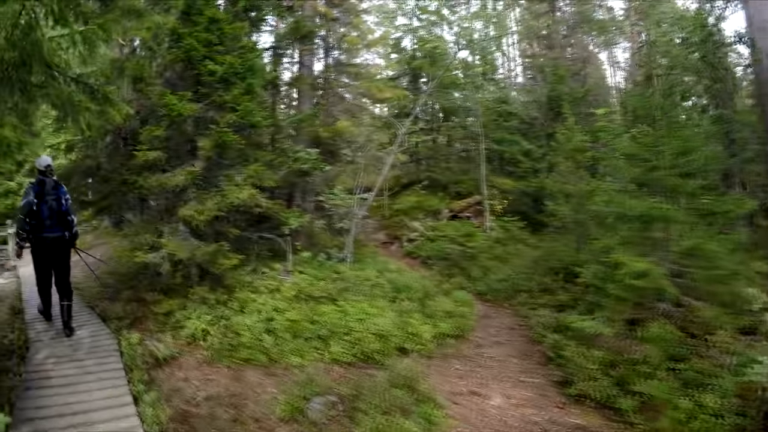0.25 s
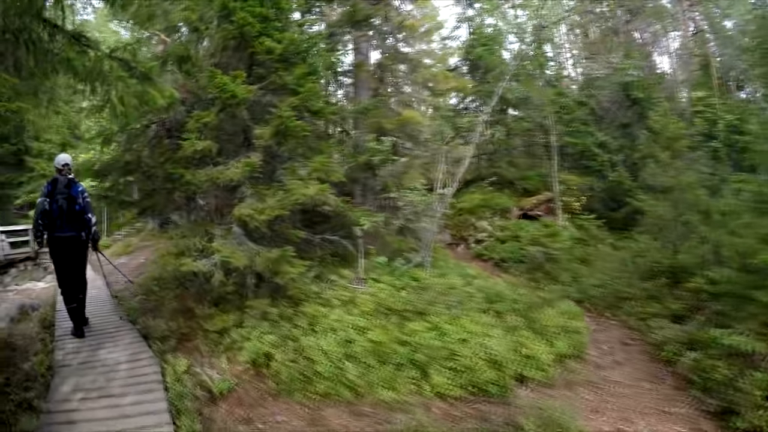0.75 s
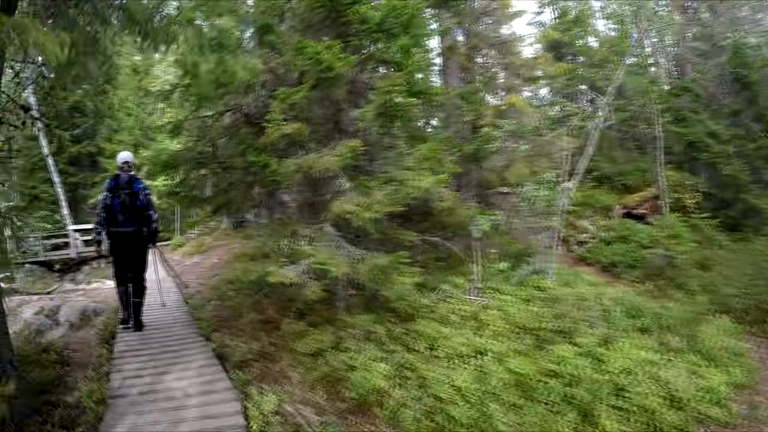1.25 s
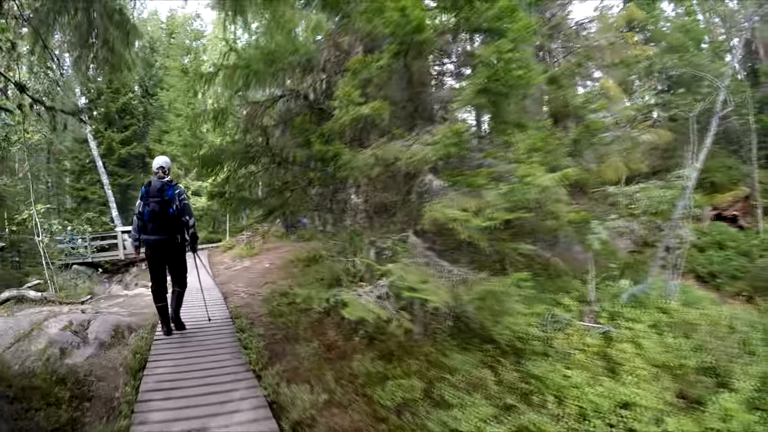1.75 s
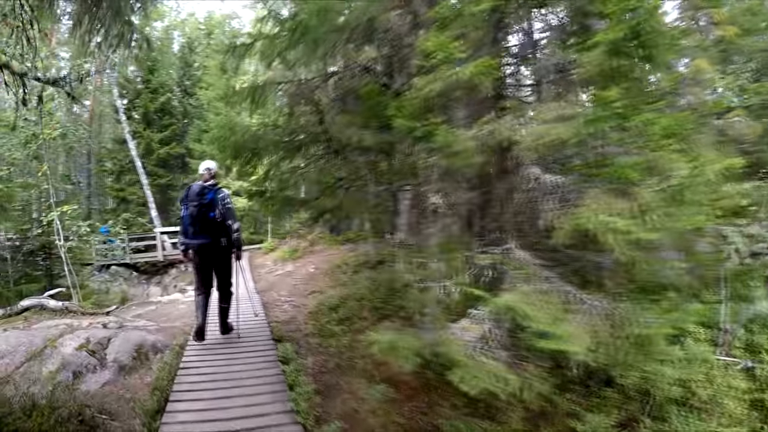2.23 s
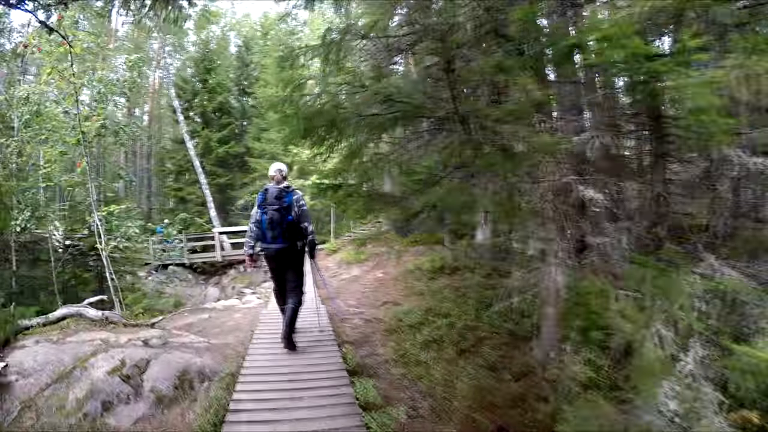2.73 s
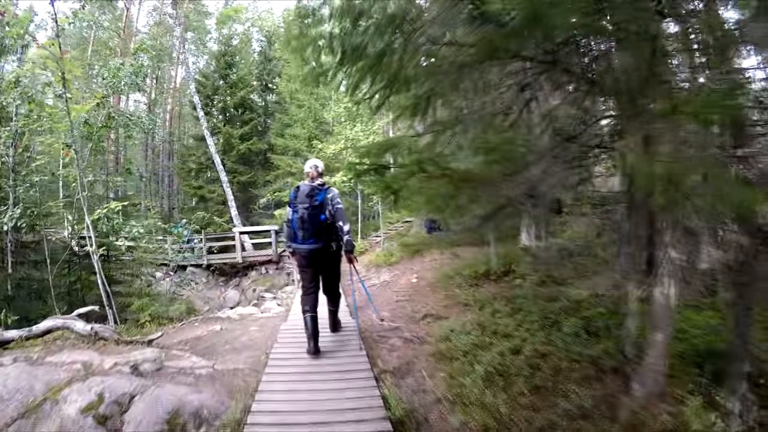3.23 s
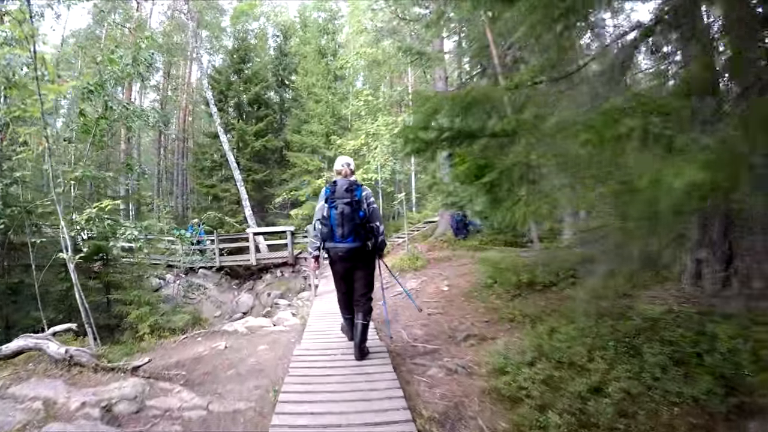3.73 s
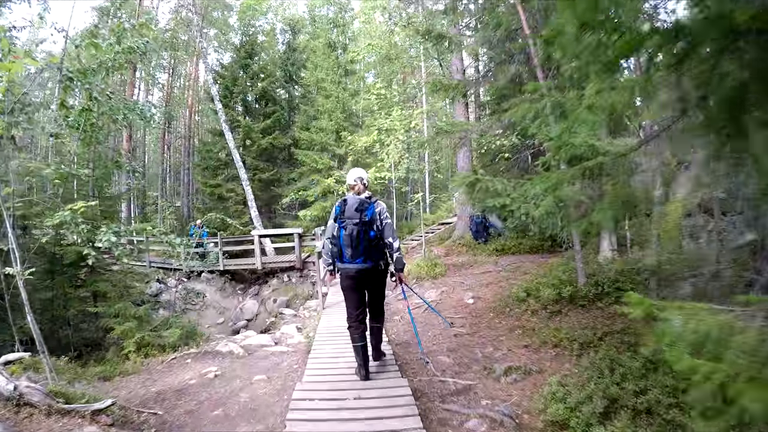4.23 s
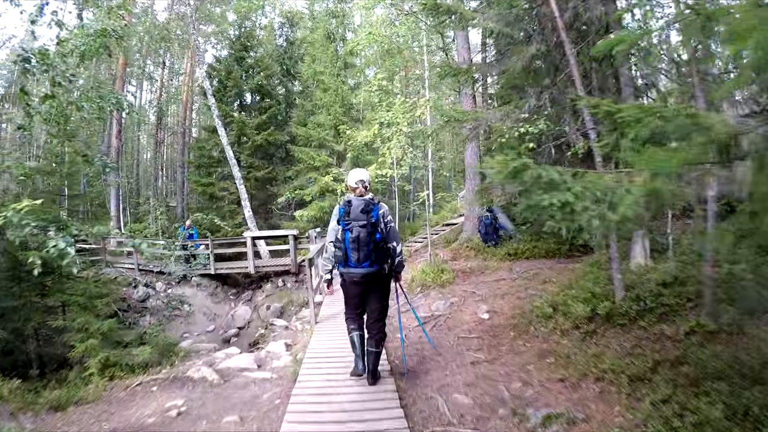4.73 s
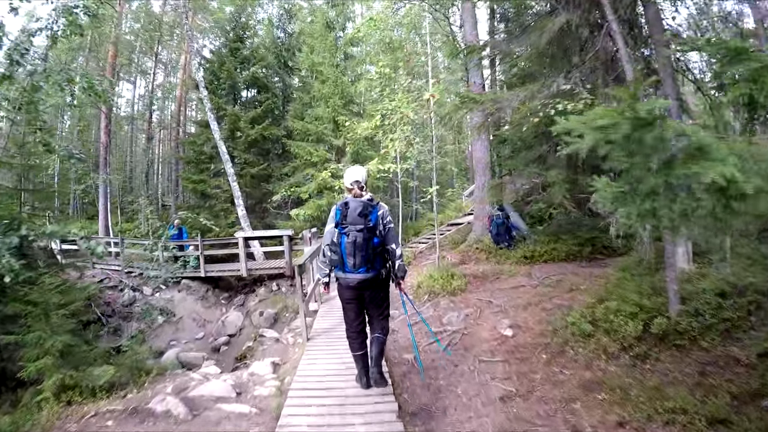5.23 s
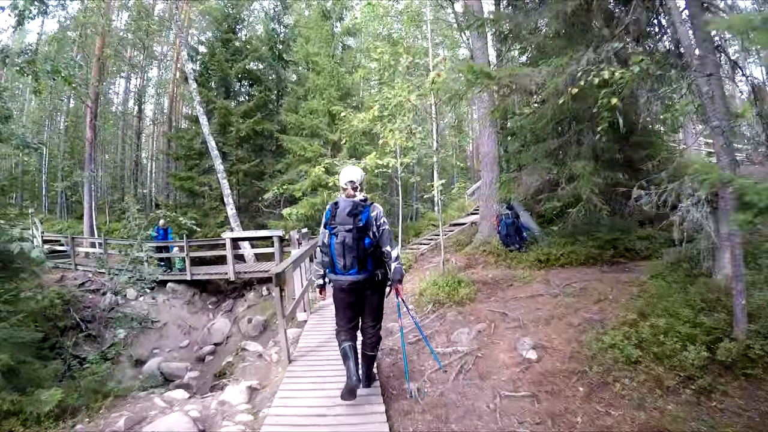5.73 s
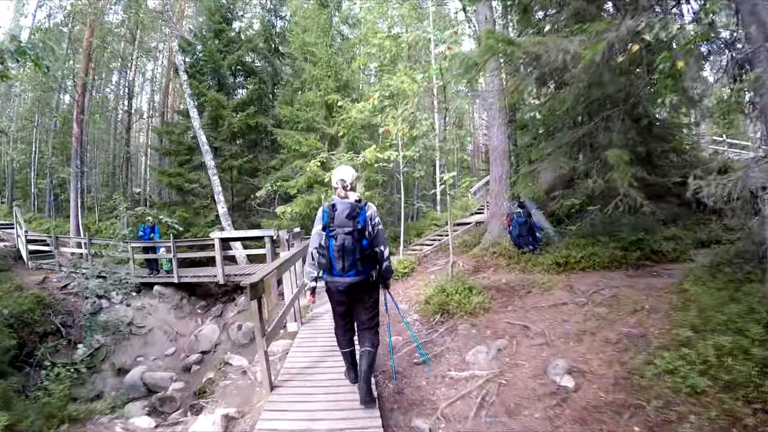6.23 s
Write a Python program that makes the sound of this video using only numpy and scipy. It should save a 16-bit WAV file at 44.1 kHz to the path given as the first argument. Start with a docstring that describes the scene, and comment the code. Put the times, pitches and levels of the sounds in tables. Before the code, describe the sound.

Hiking boots walk at an even pace along a wooden boardwalk in a quiet forest. Each step is a dull, hollow heel knock and a sole slap that leave the planks shuddering, light at first and heavier later. Clothes rub faintly, walking poles and grit tick, and something brushes softly past the hand-held microphone after the middle. Low rumble and a soft hiss lie underneath.

```python
"""Hiking boots walk down a wooden boardwalk in a quiet forest, heard from a hand-held camera.
In each step the heel knocks, the foot rolls and the sole slaps down, heavier as the walk goes on.
Each blow bends a plank and leaves the deck ringing and shuddering. Clothes rub with every stride,
something brushes close by, poles and grit tick, and a soft even hiss lies behind it all."""
import sys
import numpy as np
from scipy import signal
from scipy.fft import rfft, irfft
from scipy.io import wavfile

SR = 44100
rng = np.random.default_rng(int(sys.argv[2]) if len(sys.argv) > 2 else 0)


def wav_record(signal):
    """Record a signal, one row per channel, as 16-bit PCM in the file named by sys.argv[1]."""
    frames = np.transpose(np.atleast_2d(signal))
    bounded = np.clip(frames, -1, 1)
    # unit amplitude maps onto the largest positive 16-bit level
    quanta = np.round(bounded * 32767).astype(np.int16)
    wavfile.write(sys.argv[1], SR, quanta)


N = 285327
T = np.arange(N) / SR
USUAL_BLOW_DB = -23.5   # a step of ordinary weight


def from_db(db):
    """Turn decibels into a number to multiply a sound by."""
    return 10 ** (np.asarray(db) / 20)


def rms_one(x):
    """Scale a signal to an average power of 1."""
    return x / np.sqrt(np.mean(x ** 2) + 1e-20)


def add(out, time, sound):
    """Mix a sound into out, starting at a time in seconds."""
    start = max(int(time * SR), 0)
    out[start:start + len(sound)] += sound[:N - start]


def fade(t, fade_s):
    """A curve that dies away; the fade time is how long it takes to drop by 60 dB."""
    return np.exp(-np.log(1000) * t / fade_s)


def noise(spectrum):
    """Noise of power 1, shaped by (frequency [Hz], level [dB]) points and silent above the last."""
    hz, db = np.transpose(spectrum)
    bins = np.maximum(np.arange(N // 2 + 1) * SR / N, 1)
    shape = from_db(np.interp(np.log(bins), np.log(hz), db, right=-np.inf))
    return rms_one(irfft(rfft(rng.standard_normal(N)) * shape, N))


def band(hz, octaves, size, top_hz=10800):
    """Noise of power 1 gathered around one pitch, dull at the very top."""
    bins = np.maximum(np.arange(size // 2 + 1) * SR / size, 1)
    bell = np.exp(-(np.log2(bins / hz) / (2 * octaves)) ** 2)
    dull = 1 / np.sqrt(1 + (bins / top_hz) ** 14)
    return rms_one(irfft(rfft(rng.standard_normal(size)) * bell * dull, size))


def drift(rate_hz, hop=40):
    """A smooth random wobble, typically about 1 in size; a higher rate wobbles faster."""
    pole = np.exp(-2 * np.pi * hop * rate_hz / SR)
    draws = rng.standard_normal(N // hop + 2002)
    slow = signal.lfilter([1], [1, -2 * pole, pole * pole], draws)[2000:]   # let the filter settle
    return np.interp(np.arange(N) / hop, np.arange(len(slow)), rms_one(slow))


# the tone of the hiss: (frequency [Hz], relative level [dB])
HISS_TONE = [(350, -1), (600, -2), (740, 3.5), (960, -2), (1200, -2), (1500, 2), (1850, -5.5), (2080, -4.5),
             (3400, -12.5), (5700, -5.5), (7800, -13.5), (10000, -13), (11500, -19.5), (14000, -23.5),
             (15500, -31)]


def background(hiss_db=-57.3, rise_db_per_s=.17, whine_hz=2000, whine_db=-77):
    """Forest air and microphone hiss, growing slightly along the way, with a faint thin whine."""
    hiss = from_db(hiss_db + rise_db_per_s * T) * noise(HISS_TONE)
    whine = from_db(whine_db) * np.sqrt(2) * np.sin(2 * np.pi * whine_hz * T)
    return hiss + whine


# the tone of the deep rumble: (frequency [Hz], relative level [dB])
RUMBLE_TONE = [(12, 1), (26, 4.5), (45, 4), (70, -1.5), (100, -2), (140, -12), (260, -49)]
# the tone of the trembling boards: (frequency [Hz], relative level [dB])
BOARD_TONE = [(70, -10), (120, 1), (170, 1.5), (250, -4), (320, -8.5), (410, -12), (490, -22.5), (620, -40),
              (900, -47)]
# rumble from carrying the camera: (time [s], level [dB])
CAMERA_RUMBLE = [(0, -50), (1.3, -51), (1.62, -40), (2.3, -42), (2.68, -35.5), (3.55, -45), (3.85, -36),
                 (4.15, -42), (6.47, -41)]


def shudder(rise_s=.094, fade_s=.93, rumble_db=-31.5, boards_db=-38.8, boards_rest_db=-44.3):
    """Each heel sets the walkway shaking; it and the carried camera never quite come to rest."""
    shake = np.zeros(N)
    swing = (1 - np.exp(-T / rise_s)) * fade(T, fade_s)
    for time, heel_db, *_ in STRIDES:
        add(shake, time, from_db(.44 * (heel_db - USUAL_BLOW_DB)) * swing)   # heavy heels shake more
    camera = from_db(np.interp(T, *np.transpose(CAMERA_RUMBLE)))
    rumble_level = np.hypot(camera, from_db(rumble_db) * shake)
    boards_level = np.hypot(from_db(boards_rest_db), from_db(boards_db) * shake)
    rumble = rumble_level * from_db(1.3 * drift(rate_hz=14.5)) * noise(RUMBLE_TONE)
    boards = boards_level * from_db(1.1 * drift(rate_hz=6.1)) * noise(BOARD_TONE)
    return rumble + boards


# swishes of sleeve and pack: (middle time [s], length [s], level [dB], pitch [Hz], width [octaves])
CLOTH_SWISHES = [(0.39, .12, -61, 5050, .35), (0.852, 0.16, -61.5, 5130, 0.36),
                 (1.963, 0.061, -57, 1840, 0.19), (3.14, 0.1, -55.5, 4900, 0.33),
                 (3.159, .17, -56.5, 1810, .4), (4.631, .03, -50, 3130, 0.87),
                 (4.684, 0.075, -52.5, 1900, 0.3), (4.694, .05, -49.5, 3900, .65),
                 (5.734, 0.11, -54, 2300, .95), (5.841, 0.047, -53, 3000, 0.85)]


def clothes(rise_s=.015, release_s=.07, roughness_db=2.5):
    """Fabric rubs from each heel strike on and swishes now and then, rough as the weave catches."""
    rub = np.zeros(N)
    rise = np.minimum(T / rise_s, 1)
    for time, *_, db, length in STRIDES:
        release = np.exp(-np.maximum(T - length, 0) / release_s)
        add(rub, time, from_db(db) * rise * release)
    out = rub * band(hz=5000, octaves=.42, size=N)
    for time, length, db, hz, octaves in CLOTH_SWISHES:
        start = max(time - .5, 0)
        swell = np.exp(-(2 * (start + T[:SR] - time) / length) ** 2)
        add(out, start, from_db(db) * swell * band(hz, octaves, size=SR))
    return out * from_db(roughness_db * drift(rate_hz=160))


# one long brush close to the microphone: (time [s], level [dB], sizzle pitch [Hz])
BRUSH_STROKE = [(3.92, -67, 7400), (4.04, -54.8, 7900), (4.12, -56.5, 8400), (4.2, -53.3, 8800),
                (4.29, -58.5, 7700), (4.48, -60, 6900), (4.62, -70, 6600)]


def brush(sizzle_width_hz=2000, sizzle_growth=2.3, roughness_db=1.7):
    """A sleeve or a spruce twig slides by; the harder it presses, the higher and louder it sizzles."""
    times, stroke_db, sizzle_hz = np.transpose(BRUSH_STROKE)
    db = np.interp(T, times, stroke_db, left=-np.inf, right=-np.inf)
    body = from_db(db) * band(hz=3000, octaves=.85, size=N, top_hz=11000)
    # slow noise times a gliding tone makes a hiss that follows the tone's pitch
    smoothing = signal.butter(2, sizzle_width_hz / 2, fs=SR, output="sos")
    slow_noise = rms_one(signal.sosfilt(smoothing, rng.standard_normal(N)))
    phase = 2 * np.pi * np.cumsum(np.interp(T, times, sizzle_hz)) / SR
    sizzle = np.sqrt(2) * slow_noise * np.sin(phase)
    sizzle_db = db.max() - 1.8 + sizzle_growth * (db - db.max())   # peaks just below the body
    return (body + from_db(sizzle_db) * sizzle) * from_db(roughness_db * drift(rate_hz=120))


def tick(db, hz, fade_s, octaves=.43, rise_s=.0008, tone_db=-7):
    """Two small hard things touch: a very short burst of noise with a hint of pitch."""
    t = T[:SR // 8]
    burst = (1 - np.exp(-t / rise_s)) * fade(t, fade_s)
    tone = from_db(tone_db) * np.sin(2 * np.pi * hz * t)
    return from_db(db) * burst * (band(hz, octaves, size=len(t), top_hz=10500) + tone)


def grit(per_s=4, db=-51.5, spread_db=2.5, low_hz=1800, high_hz=6000):
    """Bits of grit snap at random moments, each with its own loudness and pitch."""
    out = np.zeros(N)
    for when, size, pitch in rng.random((int(per_s * T[-1]), 3)):
        hz = low_hz * (high_hz / low_hz) ** pitch
        add(out, when * T[-1], tick(db + spread_db * (2 * size - 1), hz, fade_s=.014))
    return out


# ticks of poles and gear: (time [s], level [dB], pitch [Hz], fade time [s], width [octaves])
GEAR_TICKS = [(0.95, -49, 2500, .016, .5), (1.173, -46, 4900, 0.024, .35), (1.544, -45, 4070, 0.017, .6),
              (1.684, -47.3, 5100, 0.019, .3), (2.2155, -44, 4460, 0.016, .4),
              (2.2473, -39.5, 3700, 0.065, .7), (2.278, -34.5, 4750, 0.016, .3),
              (3.5578, -44, 5400, 0.031, .3), (3.741, -45.5, 2100, 0.036, .45),
              (4.838, -48, 2200, .07, .45), (4.8385, -37.5, 5400, 0.045, .36),
              (5.0372, -45, 2620, 0.027, .4), (5.736, -39, 4700, 0.014, .35),
              (5.8275, -35.5, 3560, 0.014, .4)]


def gear():
    """Walking poles and gear tick as they touch something hard."""
    out = np.zeros(N)
    for time, db, hz, fade_s, octaves in GEAR_TICKS:
        add(out, time, tick(db, hz, fade_s, octaves))
    return out


def ring(hz, fade_s):
    """One note of struck wood: a pure tone dying away."""
    t = T[:SR // 2]
    return np.sin(2 * np.pi * hz * t) * fade(t, fade_s)


def push(hz, hardness, pivot_hz=163):
    """How strongly a blow drives a note: hard blows favour high notes, soft ones low notes."""
    return from_db(hardness * np.log2(np.clip(hz, 60, 330) / pivot_hz))


# the notes of a struck plank as it bends: (pitch [Hz], relative level [dB], fade time [s])
PLANK_NOTES = [(50, -0.5, 0.23), (84, 6.5, 0.045), (150, -0.5, 0.052), (258.6, 1, 0.031),
               (364, -1.5, 0.012), (775, -39, .015), (1550, -40, .012)]
# beams and nearby boards ringing on: (pitch [Hz], relative level [dB], fade time [s])
DECK_NOTES = [(70, -0.5, 0.51), (108.8, -0.5, 0.31), (165.5, -4.5, 0.35), (195.2, 3.5, 0.18),
              (234.2, -6, 0.3), (276.3, -2, 0.12), (340, -16, 0.29), (402, -8.5, 0.11)]
# loose boards humming after a step: (time [s], pitch [Hz], level [dB], fade time [s])
LOOSE_BOARDS = [(0.511, 211, -35, 0.45), (2.256, 276, -26.5, 0.15), (2.397, 230.4, -29.5, 0.36),
                (2.519, 230, -32.5, 0.22), (3.052, 287, -28.5, 0.14), (5.682, 265, -25, 0.058),
                (6.09, 180, -31, 0.17)]


def boardwalk(blows, deck_db=-37, deck_follows=.42, scatter_db=3, pitch_scatter=.023):
    """Each blow bends a plank and leaves the deck ringing; now and then a loose board hums on."""
    out = np.zeros(N)
    for time, blow_db, hardness in blows:
        for k, (hz, db, fade_s) in enumerate(PLANK_NOTES):
            direction = (-1) ** k   # neighbouring notes swing opposite ways
            add(out, time, direction * push(hz, hardness) * from_db(blow_db + db) * ring(hz, fade_s))
        ring_db = deck_db + deck_follows * (blow_db - USUAL_BLOW_DB)
        # every foot lands on another spot, so the deck rings a little differently
        for hz, db, fade_s in DECK_NOTES:
            strength = rng.choice([-1, 1]) * from_db(db + ring_db + scatter_db * rng.normal())
            pitch = hz * (1 + pitch_scatter * rng.normal())
            add(out, time, strength * push(hz, hardness) * ring(pitch, fade_s))
    for time, hz, db, fade_s in LOOSE_BOARDS:
        add(out, time, from_db(db) * ring(hz, fade_s))
    return out


# each stride, starting as the heel lands: (time [s], heel level [dB], hardness [dB per octave],
# click level [dB], foot roll level [dB], clothes rub level [dB], rub length [s])
STRIDES = [(0.505, -28.5, 3, -43, -45, -62.5, .12), (1.129, -26.5, 2.5, -52, -44, -65, 0.091),
           (1.762, -24.5, -2, -54, -34, -59.5, 0.43), (2.387, -25, 5.5, -43, -30, -62.5, 0.34),
           (3.045, -19, 0.3, -35, -36, -60.5, .28), (3.685, -18.8, -1.5, -47, -29, -63.5, .15),
           (4.348, -19, -3.2, -39.5, -27, -56.5, .09), (4.989, -23.5, -3, -43, -27, -61, 0.25),
           (5.679, -15, 1.2, -44, -31, -62, .16), (6.341, -14.8, 0.3, -36.5, -38, -61, .1)]
# the sole slapping down next, plus one more knock at 4.513 s: (time [s], level [dB], hardness [dB per octave],
# click level [dB])
SOLE_SLAPS = [(0.604, -23.5, 1.5, -42), (1.231, -30.5, 6, -44), (1.851, -31, 3.5, -50),
              (2.515, -38, -2, -54), (3.148, -27, .5, -40), (3.784, -29.5, -4, -49),
              (4.446, -26.5, 7.5, -41), (4.513, -28, 1.5, -50), (5.106, -24, -2.5, -47),
              (5.783, -30.5, -.5, -44), (6.402, -31, 4, -47)]
# knocks as the weight shifts or a pole lands: (time [s], level [dB], hardness [dB per octave])
BOARD_KNOCKS = [(2.099, -29, -.5), (2.248, -34.5, 4), (3.183, -31, -4), (3.873, -31.5, -2),
                (3.957, -33.5, 1), (4.838, -20.5, -1.8), (6.088, -32, 0), (6.174, -33, 2)]


def footsteps(roll_delay_s=.041, roll_hardness=-2.5, muffle_hz=470, treble_leak=.021, lag_s=.00252):
    """Heel, rolling foot and sole thump the wood in turn, and the boot's edge clicks as it bites."""
    heels = [(time, db, hardness) for time, db, hardness, *_ in STRIDES]
    rolls = [(time + roll_delay_s, db, roll_hardness) for time, _, _, _, db, *_ in STRIDES]
    soles = [(time, db, hardness) for time, db, hardness, _ in SOLE_SLAPS]
    wood = boardwalk(heels + rolls + soles + list(BOARD_KNOCKS))
    # the rubber sole softens the blow
    muffled = signal.sosfilt(signal.butter(4, muffle_hz, fs=SR, output="sos"), wood)
    # low notes travel more slowly along a plank: this filter only delays them
    _, delay = signal.iirpeak(230, Q=.67, fs=SR)
    out = signal.lfilter(delay[::-1], delay, muffled + treble_leak * wood)
    # the rubber gives first, so each click lags a little
    for time, _, _, click_db, *_ in STRIDES:
        add(out, time + lag_s, tick(click_db, hz=760, fade_s=.02, octaves=.7))
    for time, _, _, click_db in SOLE_SLAPS:
        add(out, time + lag_s, tick(click_db, hz=740, fade_s=.026, octaves=.7))
    return out


def scene():
    """All the sounds meet at one microphone."""
    return (background() + shudder() + clothes() + brush() + footsteps() + gear() + grit())[None]


# pitches that the camera body weakens: (frequency [Hz], width [Hz], level change [dB])
CAMERA_DIPS = [(551, 47, -24.5), (567, 25, -21.5), (1086, 94, -29), (1322, 116, -9.5)]
# how much deep bass gets through: (time [s], level [dB])
BASS_OPENING = [(0, -32), (0.48, -32), (0.62, -15), (0.85, -0.5), (1.15, 0)]


def record(dry, low_cut_hz=142, high_cut_hz=15000):
    """The camera body hollows the middle; the bass starts thin, then fills in; the very top is cut."""
    x = dry
    for hz, width_hz, db in CAMERA_DIPS:
        near_pitch = signal.lfilter(*signal.iirpeak(hz, hz / width_hz, fs=SR), x)
        x = x + (from_db(db) - 1) * near_pitch
    thin = signal.sosfilt(signal.butter(8, low_cut_hz, "high", fs=SR, output="sos"), x)
    opened = np.minimum(from_db(np.interp(T, *np.transpose(BASS_OPENING))), 1)
    x = (1 - opened ** 2) * thin + opened * x
    return signal.sosfilt(signal.ellip(10, .1, 80, high_cut_hz, fs=SR, output="sos"), x)


dry = scene()
out = record(dry)
wav_record(out)
```